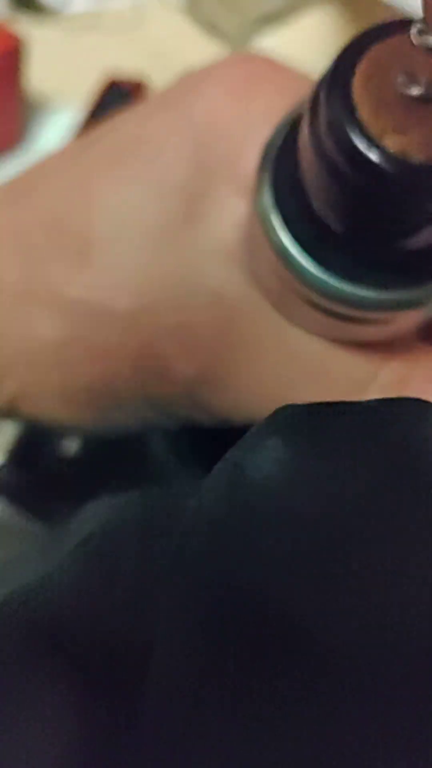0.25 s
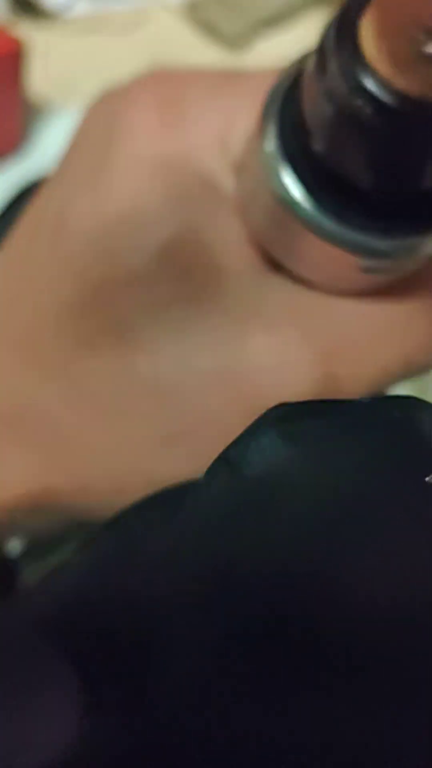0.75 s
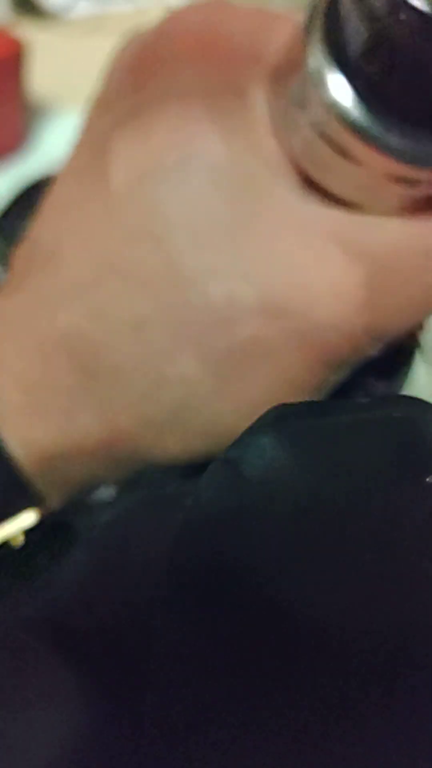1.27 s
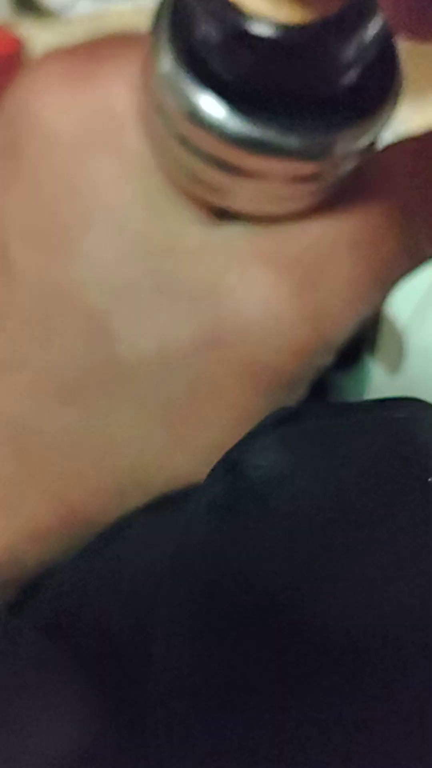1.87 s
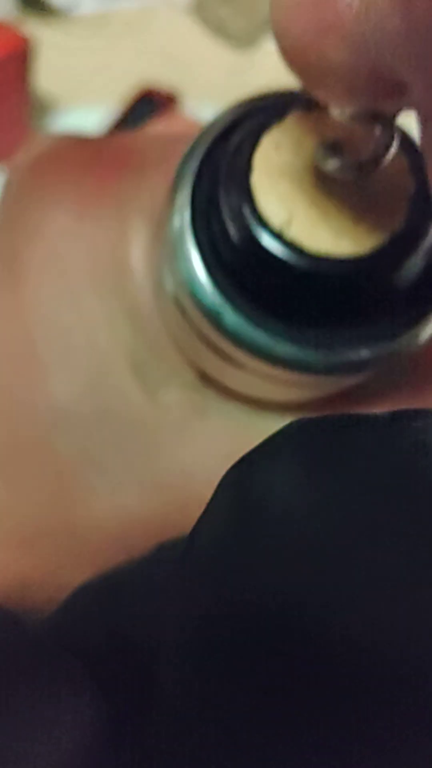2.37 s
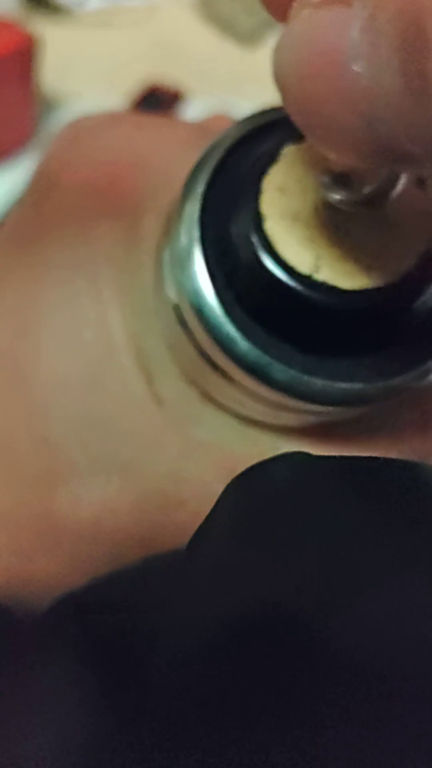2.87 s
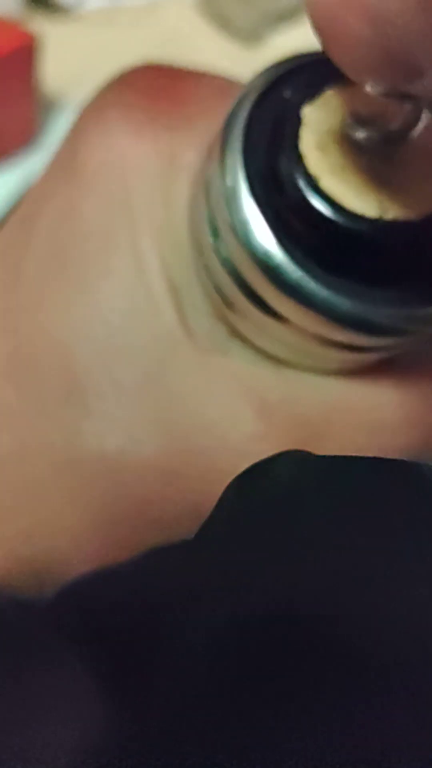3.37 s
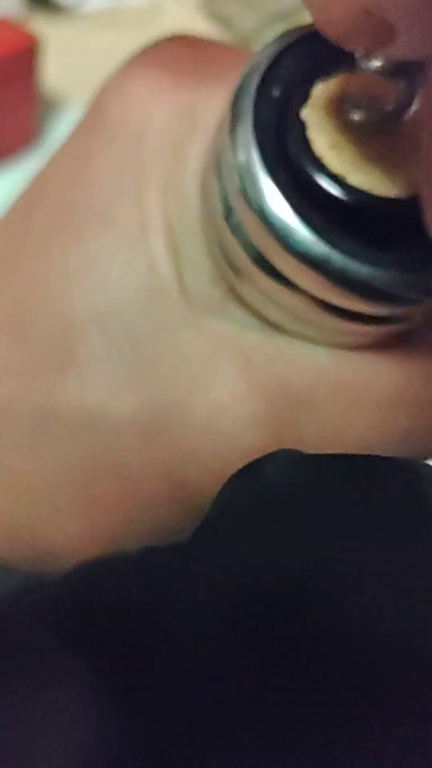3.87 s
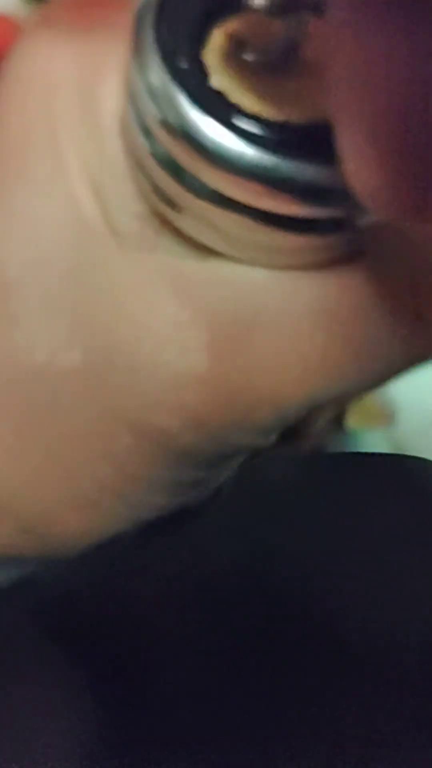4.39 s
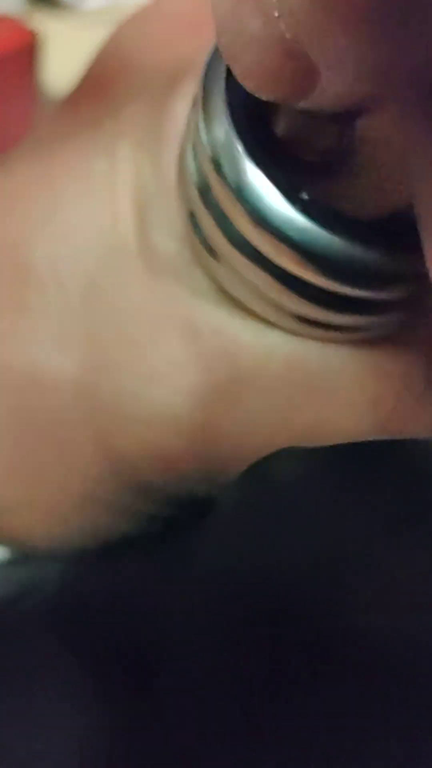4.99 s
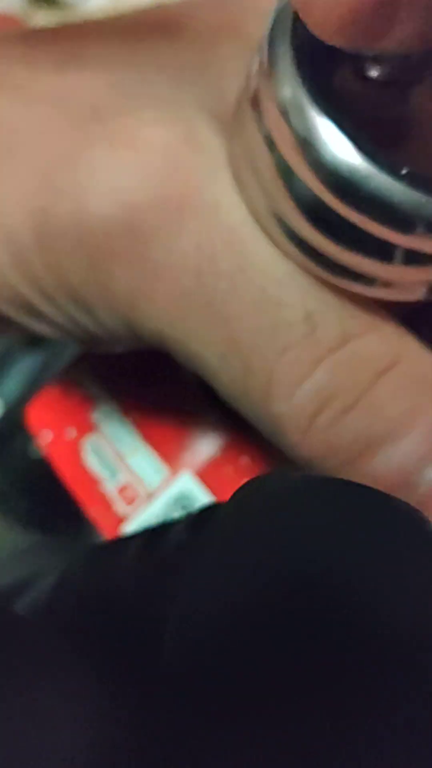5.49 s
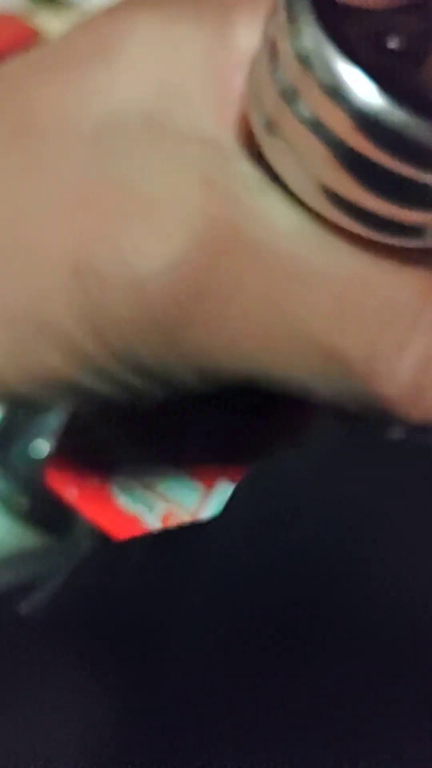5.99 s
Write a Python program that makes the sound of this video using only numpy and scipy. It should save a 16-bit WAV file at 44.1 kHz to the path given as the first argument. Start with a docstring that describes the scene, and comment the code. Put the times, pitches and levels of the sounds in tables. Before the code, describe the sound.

Extremely close and dry, a hand grips a bottle neck and works a corkscrew in its cork. Faint skin and cloth strokes with small clicks come first; near two and a half seconds one loud sharp snap lands with a knock. Rubbing then grows denser and brighter, with soft thuds, brief scrapes and scattered ticks, before thinning out over a slow low rumble. Mono, with no audible room.

```python
"""Short hissing strokes of skin and cloth, soft knocks and sharp dry snaps, close up over a slow rumble.
A corkscrew is worked in the cork of a glass bottle, gripped right next to the microphone.
Rubbing, rustle and scrapes are built from tiny random slips; snaps and scrapes ring in the screw and neck.
Knocks are quickly damped tones with grit and a low thud; squeaks are brief, unsteady tones.
The rumble is low noise that follows the sway of the grip."""
import sys
import numpy as np
from scipy import signal
from scipy.fft import rfft, irfft
from scipy.io import wavfile
from scipy.ndimage import uniform_filter1d

SR = 44100
rng = np.random.default_rng(int(sys.argv[2]) if len(sys.argv) > 2 else 0)


def pcm_store(signal):
    """Save signal as 16-bit PCM."""
    levels = np.round(np.clip(np.atleast_2d(signal), -1, 1) * 32767)
    wavfile.write(sys.argv[1], SR, levels.astype(np.int16).T)


N = 275436
TIME = np.arange(N) / SR


def amp(db):
    """Turns decibels into a gain."""
    return 10 ** (np.asarray(db) / 20)


def unit(x):
    """Scales a signal to an average strength (rms) of 1."""
    return x / np.sqrt(np.mean(x ** 2) + 1e-20)


def curve(rows, column=1):
    """Joins one column of a table by straight lines in time."""
    rows = np.asarray(rows)
    return np.interp(TIME, rows[:, 0], rows[:, column])


def add(mix, start, sound):
    """Mixes a sound in at a start time in seconds."""
    part = mix[max(round(start * SR), 0):][:len(sound)]
    part += sound[:len(part)]


def colour(x, spectrum):
    """Filters x by a table of (frequency, level), then scales it to rms 1."""
    hz, db = np.transpose(spectrum)
    f = np.fft.rfftfreq(len(x), 1 / SR)
    # straight lines between the points, on a logarithmic pitch scale
    gain = amp(np.interp(np.log(f + 1), np.log(hz + 1), db))
    return unit(irfft(rfft(x) * gain, len(x)))


def wander(hz):
    """Makes a smooth random curve: noise that loses strength steeply above hz."""
    f = np.fft.rfftfreq(N, 1 / SR)
    return unit(irfft(rfft(rng.standard_normal(N)) / (1 + (f / hz) ** 4), N))


def slips(per_s, spread_db):
    """Surfaces stick and slip: tiny pulses at random moments, a few larger than the rest."""
    size = amp(spread_db * np.minimum(rng.exponential(1, N), 4))
    direction = rng.choice([-1, 1], N)
    happens = rng.random(N) < per_s / SR
    return unit(size * direction * happens)


def friction():
    """Faster rubbing is louder: strokes swell and fade over a light resting contact, adding as power."""
    # rubbing strokes of hand and cloth: (fastest moment [s], swell [s], fade [s], relative hiss level [dB],
    # sheen over the hiss [dB], low rustle over the hiss [dB])
    strokes = [(0.188, 0.12, 0.12, -61.5, 3.5, 1), (0.597, 0.13, 0.087, -67.5, 8, 7.5),
               (0.868, 0.065, 0.18, -64.5, 5, -0.5), (1.072, 0.034, 0.091, -63.5, 4, -1),
               (1.389, 0.12, 0.085, -62.5, 5, 2.5), (1.56, 0.058, 0.096, -60, 5, -16),
               (1.869, 0.056, 0.095, -60, 5.5, 3.5), (2.071, 0.13, 0.13, -61, 7.5, -4.5),
               (2.426, 0.11, 0.075, -58, -2, -1.5), (2.566, 0.03, 0.11, -48.5, 1.5, -22),
               (2.831, 0.041, 0.096, -55.5, 1.0, -4), (2.935, 0.067, 0.12, -55, 3.5, -13),
               (3.13, 0.047, 0.05, -49.5, 3, -12), (3.259, 0.021, 0.085, -52, -1, -5),
               (3.411, 0.087, 0.062, -51.5, 4, -13), (3.577, 0.071, 0.058, -56.5, 3.5, -4),
               (3.639, 0.036, 0.026, -50.5, 1.5, -8), (3.778, 0.02, 0.037, -52, -29, -18),
               (3.924, 0.093, 0.046, -52.5, 2.5, -4.5), (4.079, 0.053, 0.09, -49.0, 2.5, -10),
               (4.229, 0.015, 0.093, -47, 3.0, -23), (4.422, 0.24, 0.09, -54.5, 4.5, -2.5),
               (4.532, 0.074, 0.1, -53, 4.5, -12), (4.75, 0.014, 0.073, -55, 6, 0),
               (4.922, 0.0036, 0.19, -57.5, -2, -3), (5.105, 0.14, 0.08, -54.5, 2.5, -1),
               (5.326, 0.02, 0.084, -54.5, 3.5, -1.5), (5.7, 0.11, 0.1, -56.5, 5.0, -1),
               (6.117, 0.046, 0.051, -61, -8, -17)]
    # light contact between the strokes: (time [s], relative hiss level [dB])
    resting = [(0, -69), (1.75, -71), (2.4, -62.5), (3.7, -64.5), (4.6, -65.5), (6.25, -64.5)]
    resting_sheen_db, resting_rustle_db = 6, 2.5  # relative to the resting hiss
    stroke_shape = 1.62  # 1 = pointed swell, 2 = bell

    power = amp(curve(resting) + np.array([[0], [resting_sheen_db], [resting_rustle_db]])) ** 2
    for moment, swell, fade, db, sheen_db, rustle_db in strokes:
        away = abs((TIME - moment) / np.where(TIME < moment, swell, fade))
        near = away < 4
        speed = np.exp(-away[near] ** stroke_shape)
        levels = amp(db + np.array([[0], [sheen_db], [rustle_db]]))
        power[:, near] += (speed * levels) ** 2
    return np.sqrt(power)  # three gains: hiss, sheen, rustle


def shifting(x, patchy_db):
    """The contact patch moves, so broad bands of the friction swell and fade on their own."""
    z = signal.stft(x, nperseg=512, noverlap=384)[2]
    patches = rng.standard_normal(z.shape)
    for _ in range(2):
        patches = uniform_filter1d(patches, size=6, axis=0)  # across pitch
        patches = uniform_filter1d(patches, size=14, axis=1)  # across time
    z = z * amp(patchy_db * unit(patches))
    return unit(signal.istft(z, nperseg=512, noverlap=384)[1][:N])


def rubbing(hiss_gain, sheen_gain):
    """Thousands of fibres catch and let go: a fine hiss with a sheen on top."""
    # relative spectra of the hiss and of its bright sheen: (frequency [Hz], level [dB])
    hiss_spectrum = [(300, -1), (1000, -2), (2100, -4.5), (2900, -0.5), (3900, 1.5), (4750, 2), (5250, -3),
                     (7000, -1), (8600, 0), (10300, -3.5), (12000, -2.5), (16000, -10)]
    sheen_spectrum = [(9500, -34), (11200, -12.5), (12400, -7), (13500, -0.5), (14700, -1.5), (15400, -7),
                      (16000, -10)]
    hiss_db, sheen_db = 1.5, 0.5  # added to the stroke levels

    hiss = colour(slips(per_s=12000, spread_db=2.0), hiss_spectrum) * hiss_gain * amp(hiss_db)
    sheen = colour(slips(per_s=16000, spread_db=3.0), sheen_spectrum) * sheen_gain * amp(sheen_db)
    both = (hiss + sheen) * amp(1.0 * wander(hz=40))
    return shifting(both, patchy_db=1.85) * np.std(both)  # back to its own strength


def rustle(gain):
    """Coarser slips of folds and skin come through the microphone's case as a dull patter with ticks."""
    # relative spectrum of the dull patter: (frequency [Hz], level [dB])
    patter_spectrum = [(40, 10), (100, 2.5), (280, 1), (380, -2), (480, -3), (750, -11.5), (1200, -12),
                       (2200, -15.5), (5000, -42)]
    # relative spectrum of small ticks of folds and fingernails: (frequency [Hz], level [dB])
    tick_spectrum = [(100, -7), (350, -2), (750, 6.5), (1200, -0.5), (2000, -24), (4000, -37), (8000, -11)]
    patter_db, ticks_db = 0.5, -12  # added to the rustle level

    patter = colour(slips(per_s=900, spread_db=0.5), patter_spectrum)
    patter *= amp(patter_db + 2.9 * wander(hz=25.0))
    ticks = colour(slips(per_s=30, spread_db=1.0), tick_spectrum) * amp(ticks_db)
    return (patter + ticks) * gain


def rumble():
    """The swaying grip pushes air at the microphone: low noise, most of it below hearing."""
    # slow sway of the grip: (time [s], level [dB])
    sway = [(0, -46), (.4, -49.5), (.56, -39.5), (1.1, -48), (1.32, -39.5), (1.75, -48), (2.23, -36),
            (3.0, -39.5), (3.75, -45.5), (4.15, -37.5), (5.4, -47.5), (5.7, -35), (6.0, -51), (6.15, -32.5)]
    # relative spectrum of the pushed air: (frequency [Hz], level [dB])
    rumble_spectrum = [(2, -1), (9, 15.5), (16, 11), (32, -9), (51, -12.5), (59, -6), (75, -16.5),
                       (120, -21), (170, -39.5), (400, -50.5)]

    noise = colour(rng.standard_normal(N), rumble_spectrum)
    return noise * amp(curve(sway)) * signal.windows.tukey(N, .01)  # short fades at both ends


def ring(force, tilt_db=0):
    """A force shakes the screw and the gripped neck, which answer at their own damped pitches."""
    # modes of the screw and neck: (frequency [Hz], width [Hz], relative level [dB])
    modes = [(1730, 770, -14), (3170, 700, -5.5), (4010, 480, 0.5), (4830, 560, -2), (6460, 770, -1.5),
             (7150, 1160, -2.5), (9630, 1400, -6), (11280, 770, -2), (12400, 1320, 1), (14650, 920, 1.5)]

    f = np.fft.rfftfreq(len(force), 1 / SR)
    response = 0
    for k, (hz, width, db) in enumerate(modes):
        response = response + (-1) ** k * amp(db) / (1 + 2j * (f - hz) / width)
    # the tilt, in dB per octave, turns around 6 kHz and stays level below 1 kHz
    tilt = amp(tilt_db * np.log2(np.maximum(f, 1000) / 6000))
    return irfft(rfft(force) * response * tilt, len(force))


def snaps(grit=1.0):
    """The screw jumps in the cork: one sharp release with a very short burst of grinding."""
    # dry snaps: (time [s], level [dB], grinding decay [s], treble tilt [dB per octave])
    snap_rows = [(0.1803, -42, 0.0012, -11), (2.2788, -25, 0.00074, -8), (2.4545, -30, .0005, -1),
                 (2.4578, -14, 0.00048, 1.5), (2.4594, -24, 0.00052, 0.5), (3.4836, -26.5, 0.00032, -8.5),
                 (3.4838, -18, 0.00066, 15), (4.1935, -32.5, 0.0019, 0.5), (4.7418, -33.5, 0.0016, -9),
                 (4.9215, -37, 0.001, -9.5), (5.3096, -35, 0.0023, -3), (5.479, -46, 0.0036, -16),
                 (5.8921, -33.5, 0.00035, 4)]
    lead = 32  # samples left free ahead of the release

    out, t = np.zeros(N), np.arange(2048) / SR
    for moment, db, decay, tilt_db in snap_rows:
        grinding = grit * unit(rng.choice([-1, 1], len(t)) * np.exp(-t / decay))
        release = unit(1. * (t == 0))
        crack = ring(np.roll(grinding + release, shift=lead), tilt_db)
        # as much energy as a plain fade with this decay, 3 dB down
        crack = crack / np.linalg.norm(crack) * np.sqrt(decay * SR / 2)
        add(out, moment - lead / SR, amp(db - 3) * crack)
    return out


def knocks(grit=0.33):
    """Flesh damps each knock within a few cycles; contact adds grit, and the hand a low thud."""
    # soft knocks of the grip: (time [s], level [dB], pitch [Hz], cycles to fall to 1/e [cycles],
    # thud level [dB], thud pitch [Hz])
    knock_rows = [(0.1806, -39.5, 705, 2, -44.5, 225), (.2238, -46, 800, 1.1, -56, 200),
                  (0.806, -48, 340, 1, -60, 150), (1.331, -45, 800, 0.88, -63, 200),
                  (1.627, -47.5, 640, 1.2, -62, 200), (2.279, -34, 715, 1.2, -46, 115),
                  (2.3075, -42.5, 480, 2.4, -55, 200), (2.352, -46, 298, 1.1, -57, 150),
                  (2.4581, -20.5, 797, 1.2, -37, 124), (2.526, -40.5, 302, 0.77, -52, 150),
                  (2.929, -41.5, 258, 1.2, -50, 140), (3.086, -36.5, 486, 1.1, -42, 260),
                  (3.226, -40.5, 600, 1.1, -44, 250), (3.436, -38.5, 269, 1, -47, 140),
                  (3.573, -35.5, 490, 0.72, -53, 200), (4.063, -44, 400, 1, -40, 198),
                  (4.1924, -35, 316, 1.2, -31, 132), (4.357, -38.5, 840, 1.7, -46, 250),
                  (4.631, -45, 710, 2, -59, 200), (4.7415, -34.5, 505, 2.5, -36.5, 130),
                  (4.743, -29.5, 260, 0.67, -35.5, 200), (4.9195, -31.5, 450, 1.13, -37.5, 111),
                  (5.106, -35, 257, .6, -39.5, 136), (5.3085, -38.5, 740, 1.5, -40.5, 145),
                  (5.4, -42, 332, 1, -55, 160), (5.479, -38.5, 540, 1.3, -41, 230)]
    # relative spectrum of the grit: (ratio to the knock's pitch [1], level [dB])
    skirt_rows = [(.2, -14), (1, 7.5), (3, -8), (12, -31)]
    thud_cycles = 0.87  # the hand's own give falls to 1/e within a cycle

    out, t = np.zeros(N), np.arange(4096) / SR
    attack = 1 - np.exp(-t / 0.00029)
    for moment, db, hz, cycles, thud_db, thud_hz in knock_rows:
        skirt = [(hz * ratio, level) for ratio, level in skirt_rows]
        envelope = attack * np.exp(-t * hz / cycles)
        tone = np.sin(2 * np.pi * hz * t)
        push = envelope * (tone + grit * colour(rng.standard_normal(len(t)), skirt))
        # grit changes the colour, not the strength
        push *= np.linalg.norm(envelope) / np.linalg.norm(push) / np.sqrt(2)
        thud = attack * np.sin(2 * np.pi * thud_hz * t) * np.exp(-t * thud_hz / thud_cycles)
        add(out, moment, amp(db) * push - amp(thud_db) * thud)
    return out


def scrapes():
    """The screw slides for a moment: a dense run of slips that dies away."""
    # short scrapes: (time [s], level [dB], length [s], decay after it [s], treble tilt [dB per octave])
    scrape_rows = [(0.862, -55, .008, .01, -1.5), (1.561, -40, 0.0054, .008, -2),
                   (1.573, -42, 0.0066, 0.013, -1.5), (4.224, -41.5, 0.019, .008, 2),
                   (4.741, -44.5, 0.01, 0.0054, 0), (4.921, -47, 0.0092, .0098, -1)]

    out, t = np.zeros(N), np.arange(8192) / SR
    for moment, db, length, decay, tilt_db in scrape_rows:
        grit = unit(ring(slips(per_s=3300, spread_db=4.5)[:len(t)], tilt_db))
        fade = np.exp(-np.maximum(t - length, 0) / decay)
        add(out, moment, amp(db) * grit * fade)
    return out


def squeaks(waver=0.036, rough=0.35):
    """For a moment the slips of cork and skin fall into step: a short, unsteady tone."""
    # brief squeaks: (time [s], rms level [dB], middle pitch [Hz], length [s])
    squeak_rows = [(1.507, -62.5, 8800, 0.064), (1.56, -56, 1900, 0.0067), (1.561, -51, 4080, 0.0061),
                   (1.572, -58, 4220, .022), (2.286, -52, 423, .012), (3.486, -57, 1190, 0.0083),
                   (3.499, -59, 1160, 0.01), (3.635, -56, 5930, .024)]

    out = np.zeros(N)
    drift, flutter = wander(hz=400), wander(hz=600)
    for start, db, hz, length in squeak_rows:
        span = (TIME >= start) & (TIME < start + length)
        pitch = hz * (1 + waver * drift[span])
        tone = np.sin(2 * np.pi * np.cumsum(pitch) / SR)
        tone *= 1 + rough * flutter[span]
        add(out, start, amp(db) * unit(tone * np.hanning(len(tone))))
    return out


def scene():
    """Adds all sources, close and dry, into one channel."""
    hiss_gain, sheen_gain, rustle_gain = friction()
    contact = rubbing(hiss_gain, sheen_gain) + rustle(rustle_gain)
    mix = contact + rumble() + snaps() + knocks() + scrapes() + squeaks()
    return mix[None]


def record(dry):
    """A steep low-pass filter takes away the very highest treble."""
    edge_hz = 15900
    low_pass = signal.firwin(511, edge_hz, window=("kaiser", 9), fs=SR)
    return signal.oaconvolve(dry, low_pass[None], "same")


dry = scene()
out = record(dry)
pcm_store(out)
```